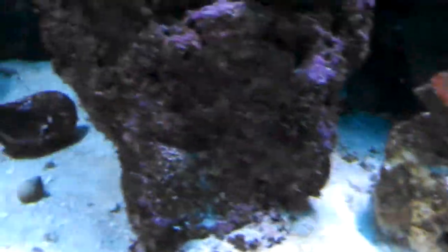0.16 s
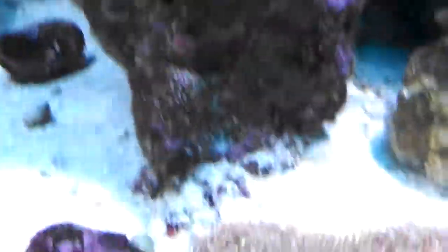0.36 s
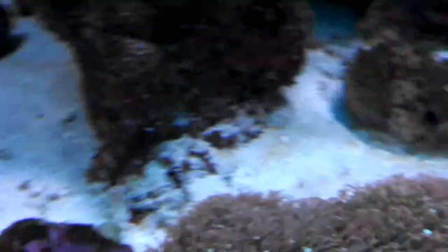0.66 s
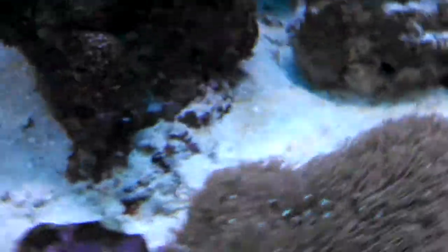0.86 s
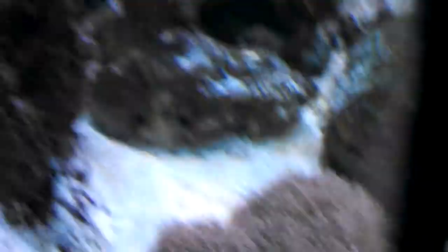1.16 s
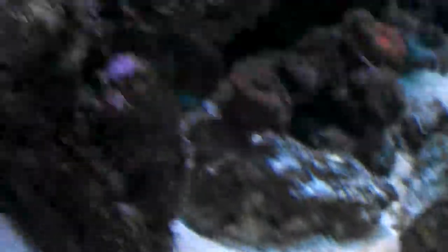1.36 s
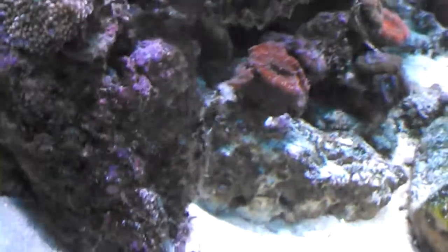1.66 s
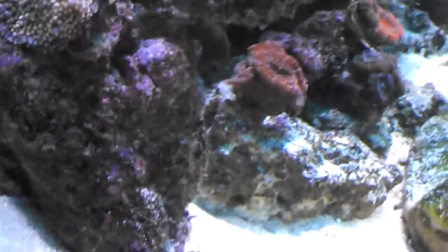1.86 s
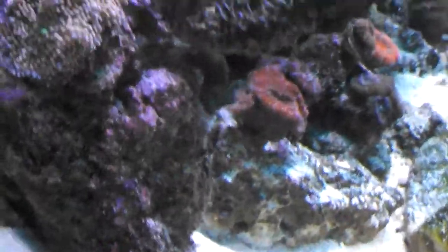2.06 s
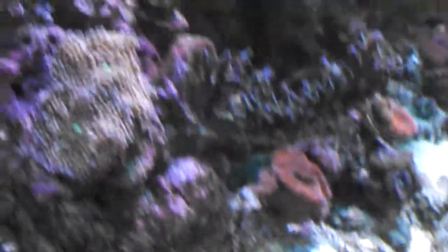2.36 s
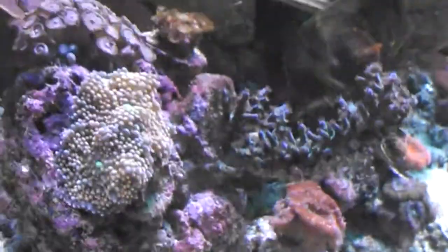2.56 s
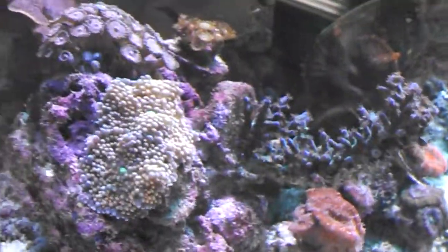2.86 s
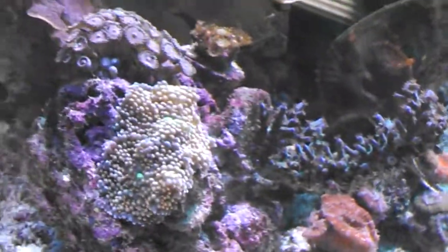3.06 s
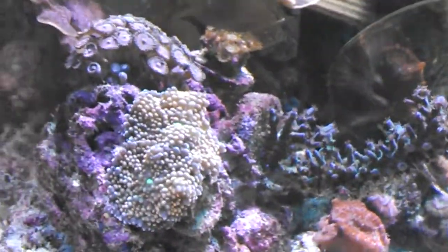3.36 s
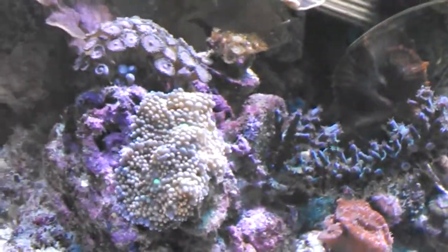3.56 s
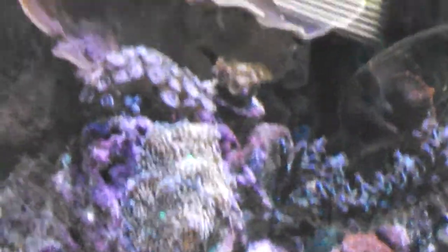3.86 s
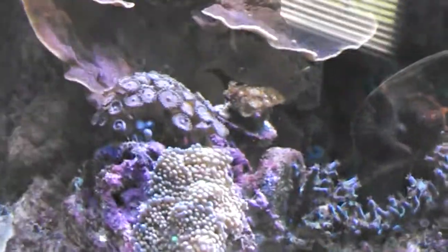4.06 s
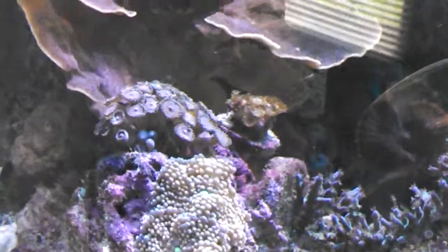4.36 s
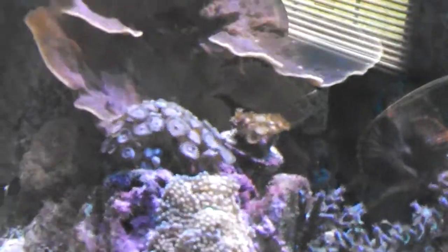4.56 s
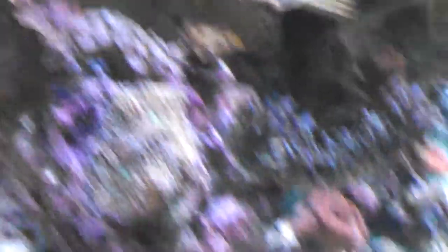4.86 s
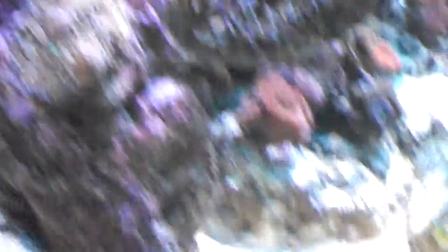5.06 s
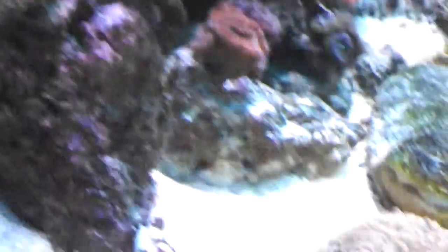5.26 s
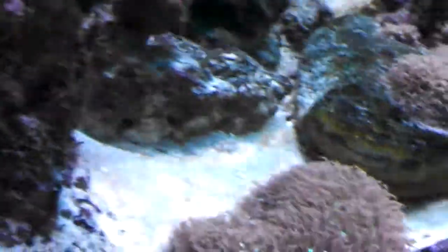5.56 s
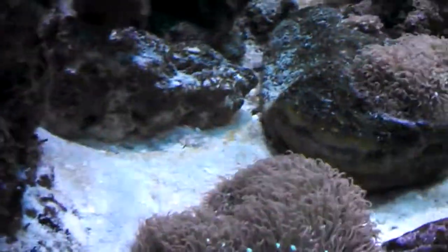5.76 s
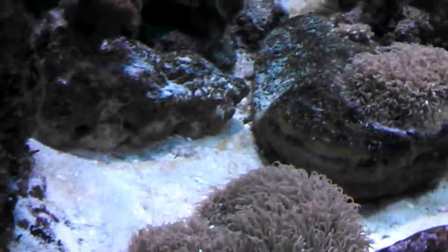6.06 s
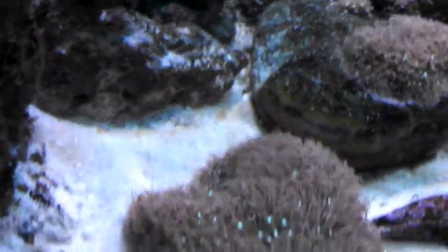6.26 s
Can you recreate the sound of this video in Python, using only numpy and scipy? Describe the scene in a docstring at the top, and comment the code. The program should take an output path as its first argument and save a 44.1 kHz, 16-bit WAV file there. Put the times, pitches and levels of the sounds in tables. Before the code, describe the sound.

Steady dull rush of circulating aquarium water with a low wavering pump hum, bubbly gurgles, small plops and a few faint dry ticks.

```python
"""Saltwater aquarium in a small room

Water circulates through the tank, heard by two close microphone ports just outside the glass.
The overflow is coloured noise with swarms of ringing bubbles; the foam is treble noise with fine pings.
Bubbles plop and burst as short resonances, dry ticks snap close by, air makes the drain pipe sing
as resonant noise, and pumps hum as beating sine tones. The recorder widens the stereo treble."""
import sys
import numpy as np
from scipy import signal
from scipy.fft import rfft, irfft
from scipy.io import wavfile

SR = 44100
rng = np.random.default_rng(int(sys.argv[2]) if len(sys.argv) > 2 else 0)


def inscribe(sig):
    """Save sig as 16-bit PCM at rate SR to the path in sys.argv[1].

    A 1-D sig is mono; a 2-D sig holds one channel per row.
    Samples are clipped to [-1, 1] before scaling.
    """
    pcm = np.round(np.clip(np.atleast_2d(sig).T, -1, 1) * 32767)
    wavfile.write(sys.argv[1], SR, pcm.astype(np.int16))


N = 283122
TIME = np.arange(N) / SR   # seconds


def from_db(db):
    """Decibels to amplitude gain."""
    return 10 ** (np.asarray(db) / 20)


def rms_one(x):
    """Scale to rms 1."""
    return x / np.sqrt(np.mean(x ** 2) + 1e-20)


def at_hz(rows, hz):
    """Every column of a table, read on a log-frequency axis."""
    points, *columns = np.transpose(rows)
    return [np.interp(np.log(hz + 1e-3), np.log(points), column) for column in columns]


def drift(rate_hz):
    """Slow random wander with rms 1: noise kept to about rate_hz and below."""
    hz = np.arange(N // 2 + 1) * SR / N
    slow = rfft(rng.standard_normal(N)) / (1 + (hz / rate_hz) ** 4)
    return rms_one(irfft(slow, N))


def swells(rows):
    """Bell-shaped rises of level, in dB."""
    return sum(gain_db * np.exp(-((TIME - middle_s) / half_width_s) ** 2)
               for middle_s, half_width_s, gain_db in rows)


def pan(left_db):
    """Gains of the two ports for a left-minus-right level difference."""
    return from_db(np.array([[left_db], [-left_db]]) / 2)


def band(x, low_hz, high_hz):
    """The part of a sound between two frequencies, in phase with the whole."""
    sos = signal.butter(2, [low_hz, min(high_hz, .45 * SR)], "band", fs=SR, output="sos")
    return signal.sosfiltfilt(sos, x)


def ring(x, hz, q):
    """A resonance: a band-pass that rings longer the sharper it is."""
    half_band = 2 ** (.7 / max(q, .8))   # frequency ratio from centre to edge
    edges = [hz / half_band, min(hz * half_band, .45 * SR)]
    sos = signal.butter(2, edges, "band", fs=SR, output="sos")
    return signal.sosfilt(sos, x + 1e-18)


def bubble_swarm(per_s, low_hz, high_hz, q, spread_db, count):
    """Bubbles born at random with uneven sizes ring at pitches spread over a range; rms 1."""
    born = rng.random(N) < per_s / SR
    size_db = spread_db * np.minimum(rng.exponential(1, N), 4)
    kicks = born * from_db(size_db) * rng.choice([-1, 1], N)
    dealt = rng.integers(0, count, N)   # which pitch each bubble gets
    swarm = np.zeros(N)
    for k, hz in enumerate(np.geomspace(low_hz, high_hz, count)):
        swarm += ring(kicks * (dealt == k), hz, q) / np.sqrt(hz)
    return rms_one(swarm)


def room(x, early_t60, late_t60, late_db):
    """Quick reflections between glass and wall, then the room's fainter tail; about the same energy."""
    t = TIME[:SR // 2]
    decay = from_db(-60 * t / early_t60) + from_db(late_db - 60 * t / late_t60)
    onset = 1 - np.exp(-t / 0.0032)
    response = rng.standard_normal((2, len(t))) * decay * onset
    response = rms_one(response) / np.sqrt(len(t))
    return signal.fftconvolve(x[None], response, axes=1)[:, :N]


# How the diffuse water reaches the two ports:
# (frequency [Hz], likeness [0-1], right port's lead [rad], left minus right level [dB])
PORT_FIELD = [(60, 0.1, 0.44, -10), (121, 1, 1.8, -0.5), (196, 0.2, 0.67, -1), (315, 0.59, 0.69, -2.5),
              (422, 0, 0.015, -1.5), (596, 0.74, 0, -0.5), (860, 0.87, 0.0089, -3), (1230, 0.53, 0.55, 1),
              (1560, 0, 0.42, 3.5), (5700, 0.03, 0.45, 6), (14000, 0.02, 0.093, -4)]


def diffuse(pair, spectrum):
    """Two unrelated white signals become a coloured sound field, partly alike at the two ports."""
    hz = np.arange(N // 2 + 1) * SR / N
    alike, lead, left_db = at_hz(PORT_FIELD, hz)
    alike = np.clip(alike, -.99, .99)
    mid, side = rfft(pair)
    sign = np.array([[1], [-1]])
    ports = np.sqrt((1 + alike) / 2) * mid + sign * np.sqrt((1 - alike) / 2) * side
    ports = ports * from_db(sign * left_db / 2) * np.exp(-.5j * sign * lead)
    # fade out beyond both ends of the spectrum
    below = (spectrum[0][0] / (hz + 1e-3)) ** 8
    above = (hz / spectrum[-1][0]) ** 40
    ends = 1 / np.sqrt((1 + below) * (1 + above))
    colour = from_db(at_hz(spectrum, hz)[0]) * np.sqrt(SR / 2)
    return irfft(ports * ends * colour, N)


# The microphone's path up and down the glass: (time [s], height [0 sand - 1 top])
MIC_HEIGHT = [(0, 0.2), (1.5, 0.056), (2.7, 0.64), (4.6, 0.25), (5.3, 0)]


def height():
    """Where the microphone is between the sand (0) and the top of the tank (1)."""
    return np.interp(TIME, *np.transpose(MIC_HEIGHT))


CORNER_S, CORNER_TURN_S = 1.5, 0.3   # the microphone rounds the corner from side pane to front
# Pump and cabinet tones, close pairs beat: (frequency [Hz], relative level [dB],
# left minus right level [dB], right port's lead [rad], gain at the side pane [dB], gain at the top [dB])
PUMP_TONES = [(58.48, -54.3, -6, -1.2, 4.2, -0.5), (92.4, -49, -3, 1.36, -1.5, 0),
              (94.73, -48, 5, 2.5, -1, -1.5), (116.96, -51.5, -1.5, 1.36, -4, -1),
              (120, -46, 7, 1.68, -4, 0.5), (175.44, -54.5, -7, 1.43, -4.5, 1),
              (178.2, -52.5, -11, 1.5, -2, 1), (226.2, -46.5, -3.5, 0.84, 0.5, -1),
              (293.3, -53.5, -4, 1.5, 1, 0.5), (420, -58.5, -4, .5, 2, 2), (451, -56, -8, -.5, 5.5, 5.5),
              (680, -64, 5, 2.5, -5, 0), (735, -58, -3.5, -.3, 0, 9), (743, -62, -3, 0, -2, 7)]


def pumps(waver_db, wander_rad):
    """Motor tones: low ones almost steady, higher ones waver; standing waves shift as the microphone moves."""
    hum, up = np.zeros((2, N)), height()
    at_side = .5 - .5 * np.tanh((TIME - CORNER_S) / CORNER_TURN_S)
    for hz, level_db, left_db, lead, side_db, top_db in PUMP_TONES:
        unsteady = (hz / 450) ** 1.3   # scales both waver and wander, 1 at 450 Hz
        phase = 2 * np.pi * (hz * TIME + rng.random())
        phase += unsteady * wander_rad * drift(3.0)
        tone = np.sqrt(2) * np.sin(phase + np.array([[0], [lead]]))
        place_db = side_db * at_side + top_db * up
        waver = unsteady * waver_db * drift(7.3)
        hum += from_db(level_db + place_db + waver) * pan(left_db) * tone
    return hum


# Resonances of the drain pipe: (frequency [Hz], relative level at rest [dB], sharpness [Q])
PIPE_RESONANCES = [(451.2, -61.5, 52), (633, -59, 41)]
# Draughts of air down the pipe: (middle [s], half width [s], gain [dB])
AIR_DRAUGHTS = [(.62, 0.24, 9.5), (1.17, 0.24, 11.5)]


def pipe_song():
    """Air drawn down the drain, as noise, sets its narrow resonances singing faintly and unevenly."""
    song = np.zeros(N)
    for hz, level_db, q in PIPE_RESONANCES:
        song += from_db(level_db) * rms_one(ring(rng.standard_normal(N), hz, q))
    return pan(-1.5) * from_db(swells(AIR_DRAUGHTS)) * song


# Dry ticks close to the ports: (time [s], relative peak level [dB])
NEAR_TICKS = [(1.849, -24), (3.312, -21.5), (3.6645, -26), (5.51, -17.5)]


def close_ticks(low_hz, echo_s, echo_gain):
    """Tiny hard snaps nearby: band-passed clicks, each with one reflection and a short room sound."""
    clicks = np.zeros(N)
    for time_s, peak_db in NEAR_TICKS:
        clicks[int(time_s * SR)] += from_db(peak_db)
        clicks[int((time_s + echo_s) * SR)] += echo_gain * from_db(peak_db)
    sos = signal.butter(1, [low_hz, 17000], "band", fs=SR, output="sos")
    snap = signal.sosfilt(sos, clicks + 1e-18)
    snap = snap * np.abs(clicks).max() / np.abs(snap).max()   # the filter keeps the highest peak
    return snap + 0.68 * room(snap, early_t60=0.094, late_t60=0.27, late_db=-14)


FIZZ_DB, FIZZ_DB_PER_S = -2.5, -0.54   # between swells the fizz slowly settles
# Smooth swells of froth: (middle [s], half width [s], gain of the finest fizz [dB])
FROTH_SWELLS = [(.3, 0.17, 3), (.95, 0.099, 3), (1.23, 0.2, 9.5)]


def fizz_level():
    """Level of the finest fizz in dB: a slow settling with swells as the foam froths up."""
    return FIZZ_DB + FIZZ_DB_PER_S * TIME + swells(FROTH_SWELLS)


HISS_FOLLOWS = 0.21   # share of the fizz's swing in dB that the coarser hiss takes
# Colour of the foaming surface: (frequency [Hz], relative level per Hz [dB])
FOAM_SPECTRUM = [(3200, -84), (5500, -91), (8500, -92), (11000, -99), (13000, -89.5), (15200, -84)]


def surface(hiss_db, fizz_db):
    """Foam hisses as noise, its finest bubbles fizz on top, small ones ping and thin films crackle."""
    flicker_db = 0.5 * drift(20) + 0.6 * drift(5)
    foam = diffuse(rng.standard_normal((2, N)) * from_db(flicker_db), FOAM_SPECTRUM)
    fizz = band(foam, 11000, 19000)
    hiss = foam - fizz
    pings = bubble_swarm(per_s=60, low_hz=2800, high_hz=7500, q=10, spread_db=1.5, count=24)
    crackle = bubble_swarm(per_s=36, low_hz=8000, high_hz=15000, q=1, spread_db=1.5, count=5)
    small = from_db(-61.5) * pings + from_db(-59.5) * crackle
    small = .5 * small + room(small, early_t60=0.07, late_t60=0.34, late_db=-34)
    return from_db(hiss_db) * hiss + from_db(fizz_db) * fizz + small


# energy share of a 1 kHz pop sent direct before the final balance, and its power law with pitch
DIRECT_SHARE, DIRECT_SLOPE = 0.6, -0.7
# Bubble bursts, from low glugs to high ticks; some rows are a plop's overtone or its echo:
# (time [s], pitch [Hz], relative level [dB], sharpness [Q])
BUBBLE_BURSTS = [(0.387, 335, -38, 2.9), (.453, 436, -37, 9.9), (.493, 437, -42, 7.7),
                 (.542, 440, -36, 5.3), (0.599, 6400, -48, 6.9), (.645, 433, -32, 5.4), (.693, 450, -40, 6),
                 (0.743, 430, -32, 4.4), (0.771, 460, -38, 5), (.798, 363, -31, 7.6),
                 (1.073, 426, -30, 2.7), (1.214, 4140, -42.5, 1.3), (1.3087, 8900, -38.5, 3.2),
                 (1.415, 570, -33, 2.7), (1.448, 4760, -41.5, 7.3), (1.449, 7650, -47, 6),
                 (1.6837, 800, -39, 1.5), (1.7531, 1172, -24.5, 5.2), (1.7535, 13000, -44, 1.3),
                 (1.754, 1920, -44, 4), (1.7631, 1230, -29.5, 3.9), (1.84, 1160, -41, 6),
                 (1.875, 3850, -39.5, 1), (2.0037, 6940, -48.5, 13), (2.034, 4020, -43, 4.3),
                 (2.115, 2090, -36.5, 21), (2.4219, 1220, -30, 9), (2.423, 1880, -43, 2.7),
                 (2.4409, 6700, -46, 5.7), (2.454, 1080, -37, 3), (2.635, 966, -36.5, 8.5),
                 (2.7497, 5400, -40, 4.6), (2.80, 13500, -51, 3), (2.887, 1000, -38, 5),
                 (2.912, 900, -39, 6), (3.14, 9500, -46, 1.7), (3.183, 13000, -43, 1.5),
                 (3.188, 4940, -41.5, 11), (3.311, 14300, -37, 4.5), (3.45, 8030, -39.5, 6),
                 (3.632, 5500, -45, 8), (3.6645, 14200, -37, 4), (3.872, 3020, -45, 10),
                 (3.927, 9000, -48, 2), (3.9692, 5170, -40.5, 0.92), (4.0397, 4700, -45, 12),
                 (4.285, 5760, -38, 1.4), (4.432, 2850, -43, 11), (4.574, 12200, -44.5, 1.8),
                 (4.644, 1004, -38, 21), (4.751, 4930, -45, 11), (4.83, 11500, -45, 2.3),
                 (4.927, 5560, -35, 3.3), (5.305, 13000, -49, 3), (5.522, 4880, -40.5, 7),
                 (5.676, 6590, -44.5, 8.6), (5.7, 4000, -42.5, 2.5), (6.0787, 656, -33.5, 2.4),
                 (6.2173, 6300, -49, 10), (6.276, 4050, -46.5, 1.5)]


def pops(echo_s, echo_gain):
    """Each row snaps and rings briefly; it arrives directly, off the wall and through the room."""
    direct, scattered = np.zeros(N), np.zeros(N)
    click = signal.unit_impulse(SR // 10)
    for time_s, hz, level_db, q in BUBBLE_BURSTS:
        at = int(time_s * SR)
        share = np.clip(DIRECT_SHARE * (hz / 1000) ** DIRECT_SLOPE, 0, 1)
        # the film's snap is broad and a little higher than the ring
        snap = rms_one(ring(click, 1.08 * hz, 0.95))
        shape = rms_one(ring(click, hz, q)) + 0.2 * snap
        pop = (from_db(level_db - 14.5) * rms_one(shape))[:N - at]
        direct[at:at + len(pop)] += np.sqrt(share) * pop
        scattered[at:at + len(pop)] += np.sqrt(1 - share) * pop
    echo = np.interp(TIME - echo_s, TIME, direct)
    direct = (direct + echo_gain * echo) / np.hypot(1, echo_gain)
    wet = room(scattered, early_t60=0.075, late_t60=0.26, late_db=-7)
    return from_db(2.5) * direct + from_db(5.0) * wet


PIPE_DB = -1.55   # drain pipe's gurgle between surges
# Smooth surges of the drain pipe's gurgle: (middle [s], half width [s], gain [dB])
PIPE_SURGES = [(.65, 1, 2), (5.5, 0.18, 0.7)]


def pipe_level():
    """Level of the drain pipe's gurgle in dB, swelling in surges."""
    return PIPE_DB + swells(PIPE_SURGES)


SPLASH_LOW_DB, SPLASH_RISE_DB = 1.7, 1   # splash heard at the sand, and its gain at the top
# Colour of the overflow's rush: (frequency [Hz], relative level per Hz [dB])
RUSH_SPECTRUM = [(28, -92), (45, -82), (70, -73), (140, -66), (180, -62), (255, -66), (320, -58.5),
                 (380, -63), (430, -60), (540, -68), (630, -68), (790, -69.5), (1000, -75.5), (1300, -77.5),
                 (1800, -79.5), (3200, -85.5)]


def overflow(pipe_db, splash_db):
    """Falling water: a dull noise rush with clumps of bubbles and higher blips; pipe and splash bands move."""
    rush = from_db(-1.63) * diffuse(rng.standard_normal((2, N)), RUSH_SPECTRUM)
    crowd = bubble_swarm(per_s=220, low_hz=283.0, high_hz=776, q=13.6, spread_db=1.5, count=18)
    crowd = crowd * from_db(1.0 * drift(4.8))
    blips = bubble_swarm(per_s=30, low_hz=800, high_hz=1900, q=12, spread_db=1.5, count=14)
    crowd += .3 * blips
    gurgle = 0.56 * crowd + 0.72 * room(crowd, early_t60=0.073, late_t60=.3, late_db=-41)
    water = rush + from_db(-45.0) * pan(-0.53) * gurgle
    # gain minus one: adding the band back changes its level
    pipe = (from_db(pipe_db) - 1) * band(water, 235, 800)
    splash = (from_db(splash_db) - 1) * band(water, 890, 1110)
    return water + pipe + splash


def scene():
    """Pumps, water and bubbles at the two ports."""
    hum = from_db(-.5) * pumps(waver_db=2.0, wander_rad=0.67)
    ticks = close_ticks(low_hz=6000, echo_s=0.014, echo_gain=0.19)
    fizz_db = fizz_level()
    foam = surface(HISS_FOLLOWS * fizz_db, fizz_db)
    bubbles = pops(echo_s=0.028, echo_gain=0.1)
    splash_db = SPLASH_LOW_DB + SPLASH_RISE_DB * height()
    water = overflow(pipe_level(), splash_db)
    return hum + pipe_song() + ticks + foam + bubbles + water


WIDEN_ABOVE_HZ, CUTOFF_HZ = 1170, 15420   # only the treble is widened; the top is cut


def record(dry):
    """Stereo widening subtracts the other port's treble, slightly delayed, from each side; the top is cut."""
    hz = np.arange(N // 2 + 1) * SR / N
    cross_delay_s = 16 / SR
    cross = hz ** 8 / (hz ** 8 + WIDEN_ABOVE_HZ ** 8)
    ports = rfft(dry)
    other = cross * np.exp(-2j * np.pi * hz * cross_delay_s) * ports[::-1]
    wide = (ports - other) / np.sqrt(1 + cross ** 2)
    out = pan(-1.0) * irfft(wide, N)
    top_cut = signal.ellip(12, .1, 80, CUTOFF_HZ, fs=SR, output="sos")
    return signal.sosfilt(top_cut, out)


dry = scene()
out = record(dry)
inscribe(out)
```